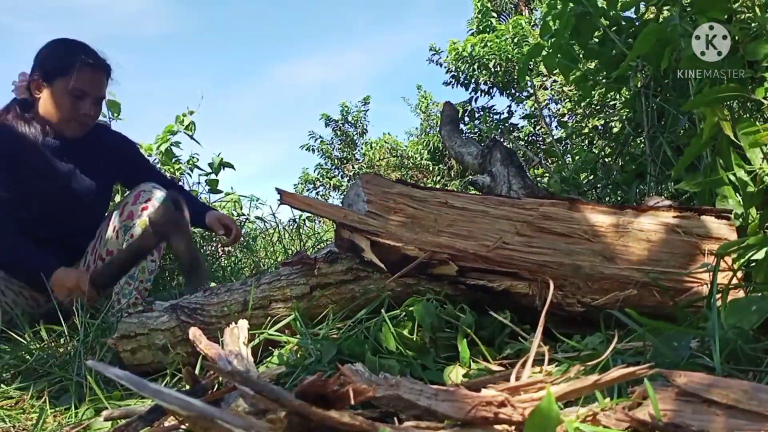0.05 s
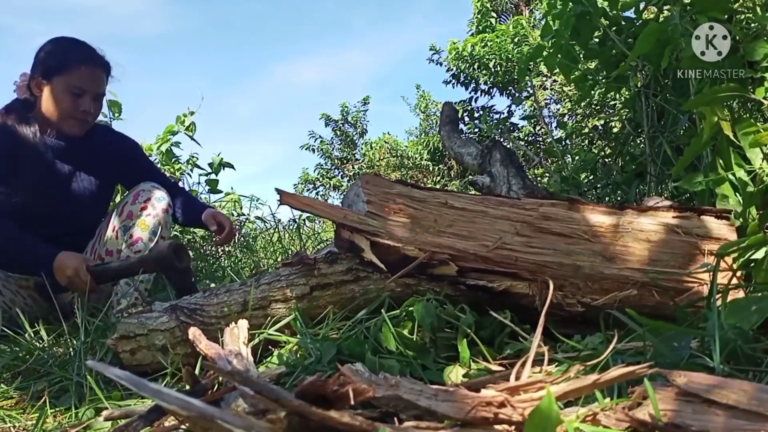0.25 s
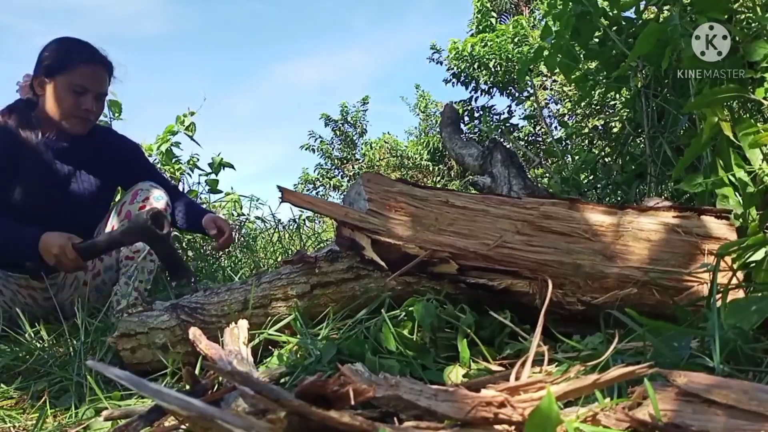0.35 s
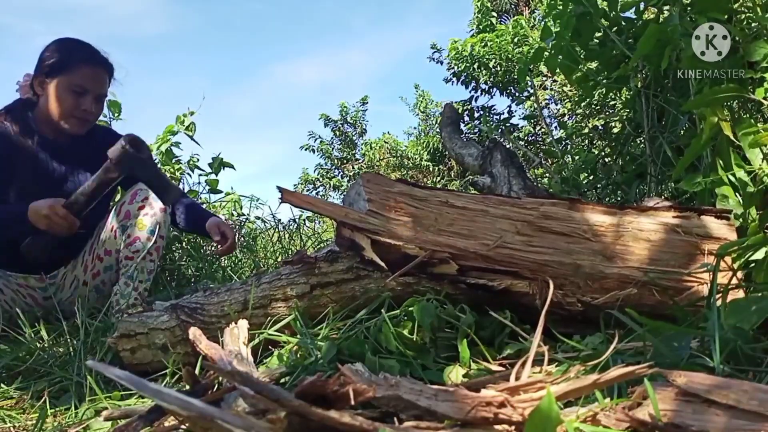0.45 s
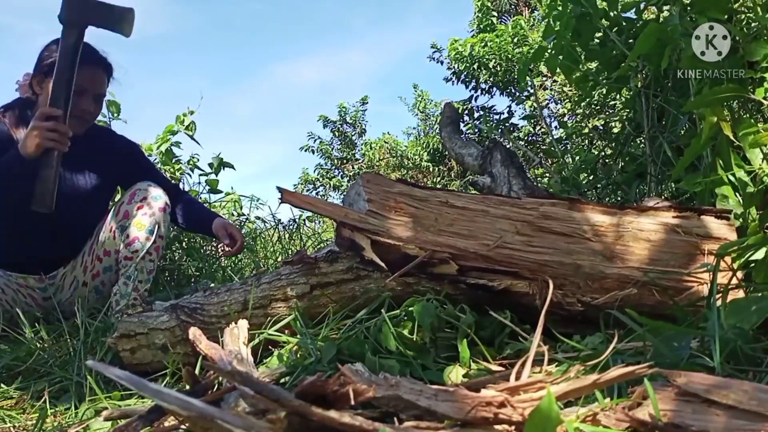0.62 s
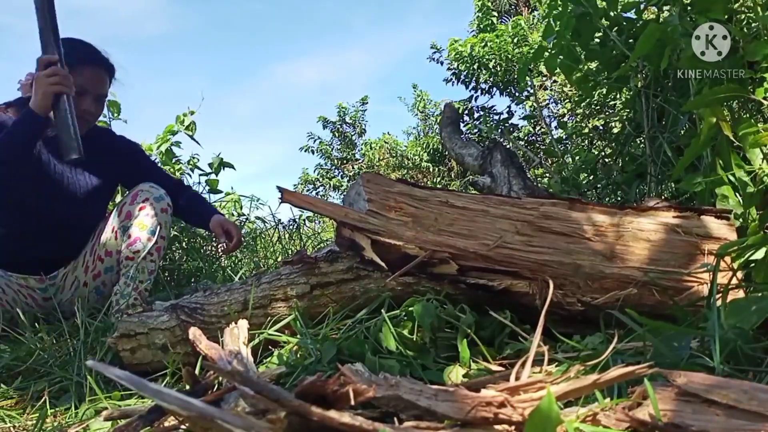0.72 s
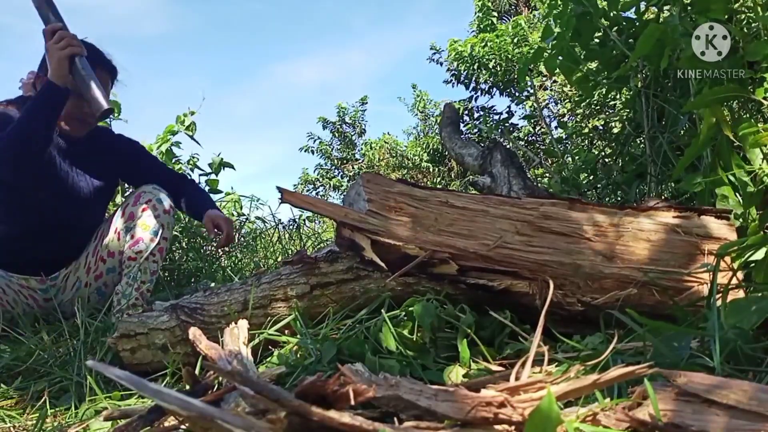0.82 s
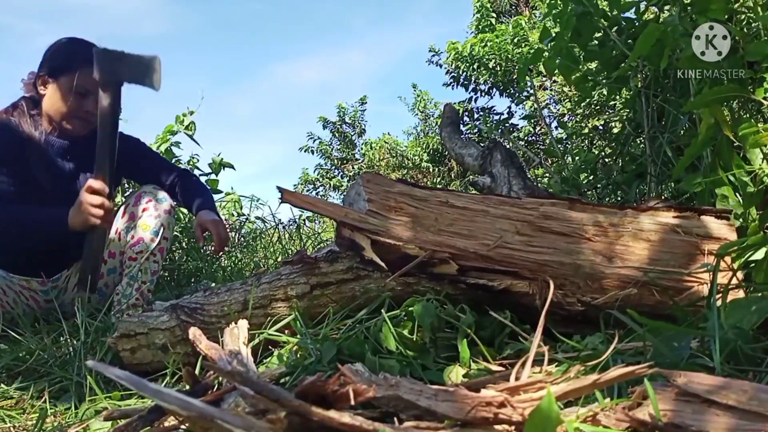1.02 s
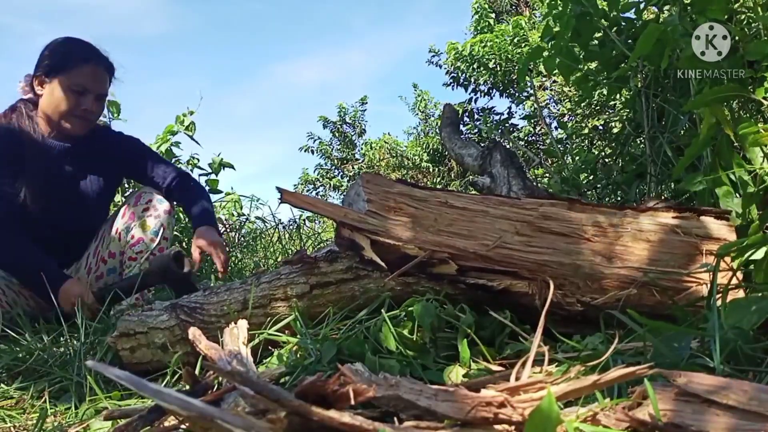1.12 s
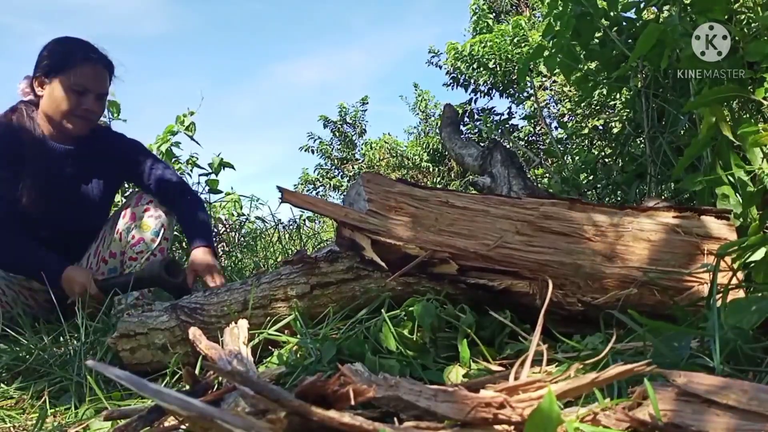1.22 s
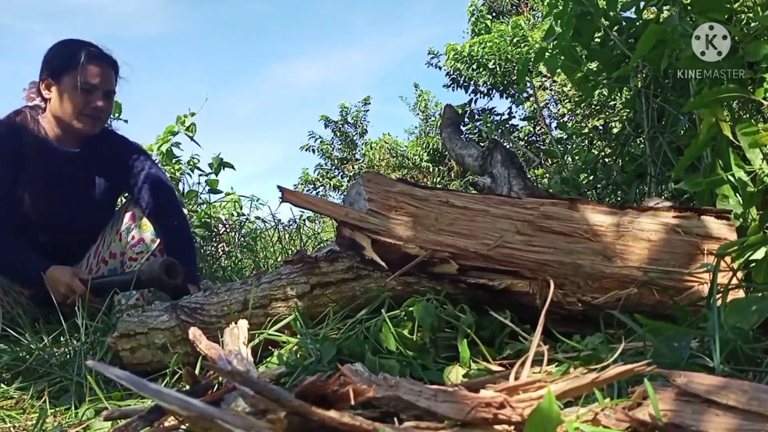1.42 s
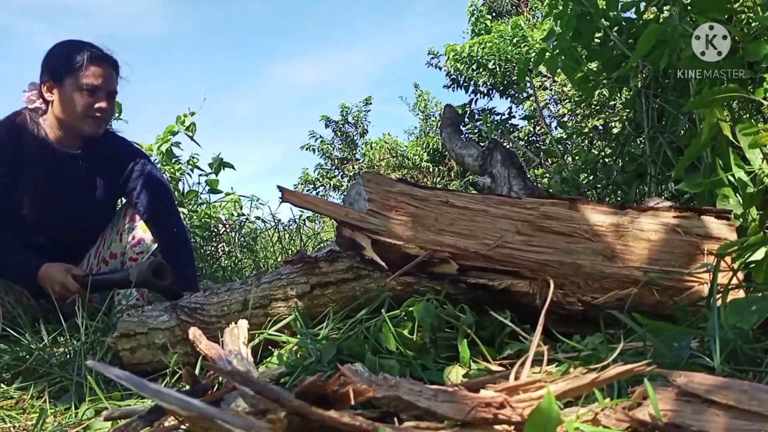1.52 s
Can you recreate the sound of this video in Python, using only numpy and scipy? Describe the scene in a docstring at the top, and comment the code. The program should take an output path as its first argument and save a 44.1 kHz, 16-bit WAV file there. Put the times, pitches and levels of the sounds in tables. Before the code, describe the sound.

A heavy blade chops a dry log at about 0.22 s: a short hollow knock, bright fibre crack, low ground thud and soft wash fading through the bushes. A very faint metallic ring follows near 0.45 s, with tiny ticks around 0.5, 1.0 and 1.2 s and a barely audible high whistle. A louder, fuller chop lands at 1.24 s. Quiet rumble and leaf hiss continue underneath.

```python
"""Two chops into a dry log

A heavy blade bites twice in quick jolts: short pushes ring the log's low modes, snaps its high modes.
Noise bursts are cracking fibres and splinters, a decaying sine is the ground thud, and swelling noise
is the soft late wash from the bushes. Shaped noise makes far rumble and leaf hiss; under it lie a faint
wavering whistle (sine), small ticks (band noise) and the ring of the blade pulled free (sine)."""
import sys
import numpy as np
from scipy import signal
from scipy.fft import rfft, irfft
from scipy.io import wavfile
from scipy.ndimage import uniform_filter1d

SR = 44100
rng = np.random.default_rng(int(sys.argv[2]) if len(sys.argv) > 2 else 0)


def volts(x):
    """Linear amplitude factor 10**(x/20) for a level x in dB, scalar or array-like."""
    e = np.asarray(x, float) / 20
    return 10 ** e


def transcribe(signal):
    """Save signal, clipped to [-1, 1], as a 16-bit WAV file at the path in sys.argv[1]."""
    frames = np.atleast_2d(signal).T
    limited = np.clip(frames, -1, 1)
    pcm = np.round(limited * 32767).astype(np.int16)
    wavfile.write(sys.argv[1], SR, pcm)


N = 68355

# modes of the log: pitch_hz, level_db, t60_s
LOG_MODES = [(145.7, -1.3, .092), (206.8, 5.3, .053), (315.7, -11.6, .109), (479.1, 9.5, .028),
             (683.9, .3, .099), (755, -20, .032), (950, -34, .04), (1500, -31, .025), (2500, -21, .014),
             (3000, -28, .02), (3570, -35, .06)]
SPLIT_HZ = 720  # jolts ring the modes below, snaps those above


def level(x, rms_db):
    """Scale to an rms level."""
    return x * volts(rms_db) / np.sqrt(np.mean(x ** 2))


def colour(x, points):
    """Weigh the spectrum by (Hz, dB) points, interpolated over log frequency."""
    hz, db = np.array(points, float).T
    f = np.maximum(np.arange(len(x) // 2 + 1) * SR / len(x), 1)
    gain = volts(np.interp(np.log(f), np.log(hz), db))
    return irfft(rfft(x) * gain, len(x))


def since(start_s):
    """Seconds after start_s, zero before."""
    return np.maximum(np.arange(N) / SR - start_s, 0)


def fade(t, t60_s):
    """Exponential decay, 60 dB in t60_s."""
    return np.exp(-np.log(1000) * t / t60_s)


def walk(rate_hz):
    """Unit normal levels held 1 / rate_hz s, then smoothed twice, which narrows their spread."""
    hold = int(SR / rate_hz)
    steps = np.repeat(rng.standard_normal(N // hold + 1), hold)
    return uniform_filter1d(uniform_filter1d(steps, hold), hold)[:N]


def rings(modes, place):
    """Impulse response: decaying sines, each weighted by its mode shape at a place along the log."""
    half_wave_hz = 155  # pitch whose half wave spans the log
    t = np.arange(SR // 3) / SR
    out = 0
    for hz, db, t60_s in modes:
        shape = np.cos(np.pi * hz / half_wave_hz * place)
        out = out + volts(db) * shape * np.sin(2 * np.pi * hz * t) * fade(t, t60_s)
    return out


def log_jolts():
    """Short flat pushes ring the low modes; the deepest bass does not radiate."""
    # jolts of the biting blade: start_s, level_db, push_ms, place (0-1 along the log)
    jolts = [(.22265, -8.6, .2, .379), (.22524, -12, .2, .379), (.22623, -5.9, .2, .379),
             (1.24154, -11.7, .9, .439), (1.24531, -5, .9, .439), (1.24746, -10.3, .9, .439)]
    radiates_from_hz = 120
    low_modes = [m for m in LOG_MODES if m[0] < SPLIT_HZ]
    out = 0
    for start_s, db, push_ms, place in jolts:
        travel = np.minimum(since(start_s) * 1000 / push_ms, 1)
        push = np.diff(travel, prepend=0)
        out = out + volts(db) * signal.fftconvolve(push, rings(low_modes, place))[:N]
    return signal.lfilter(*signal.butter(3, radiates_from_hz, "high", fs=SR), out)


def grain_snaps():
    """Single sharp snaps of the grain, as the blade stops, ring the high modes."""
    # snaps: start_s, level_db
    snap_list = [(0.2264, 5.5), (1.2470, 10.5)]
    from_hz, top_hz = 450, 4500
    ring = rings([m for m in LOG_MODES if m[0] > SPLIT_HZ], 0)
    x = sum(volts(db) * np.pad(ring, (int(start_s * SR), N))[:N] for start_s, db in snap_list)
    return signal.lfilter(*signal.butter(2, [from_hz, top_hz], "band", fs=SR), x)


def crack(start_s, crack_db):
    """Fibres tear as a fast noise burst, splinters as sparse random impulses; both share one spectrum."""
    # crack spectrum: pitch_hz, density_db (per Hz, relative)
    crack_spectrum = [(530, -38.5), (900, -11), (1250, -8), (1680, 2.5), (2000, -4.5), (2540, -2),
                      (3300, -3), (4600, -11.5), (5200, -13.5), (6560, -24.5), (8500, -5), (9500, -16),
                      (11100, -26.5), (14900, -28), (16000, -36)]
    rise_s, t60_s = 0.0035, 0.05
    splinter_db, splinter_t60_s, splinters_per_s = -4, 0.12, 9300
    t = since(start_s)
    rise = np.minimum(t / rise_s, 1)
    noise = rng.standard_normal(N)
    fibres = rise ** 2 * fade(np.maximum(t - rise_s, 0), t60_s) * noise
    hits = rng.random(N) < splinters_per_s / SR
    impulses = rng.standard_normal(N) * hits * np.sqrt(SR / splinters_per_s)  # unit rms
    splinters = volts(splinter_db) * rise * fade(t, splinter_t60_s) * impulses
    steady_rms = np.std(colour(noise, crack_spectrum))
    return volts(crack_db) * colour(fibres + splinters, crack_spectrum) / steady_rms


def thud(start_s, thud_db):
    """The ground answers late as a low decaying sine with a soft onset."""
    thud_hz, late_s, rise_s, t60_s = 86, 0.0091, 0.0092, 0.13
    t = since(start_s + late_s)
    envelope = (1 - np.exp(-t / rise_s)) * fade(t, t60_s)
    return volts(thud_db) * envelope * np.sin(2 * np.pi * thud_hz * t)


def wash(start_s, wash_db, hold_s):
    """The bushes return flickering noise that swells, holds and decays by band."""
    # wash spectrum: pitch_hz, density_db (per Hz, relative)
    wash_spectrum = [(35, -44), (60, -11), (110, -4), (156, -1.5), (227, -8.5), (437, -9.5), (621, -24),
                     (822, -18), (1200, -27.5), (1620, -16.5), (2400, -17.5), (3400, -15.5), (4300, -25.5),
                     (6430, -35.5), (8700, -24.5), (9700, -36.5), (12300, -44), (14900, -41), (16000, -63)]
    swell_start_s, peak_s = 0.02, 0.065  # after the blow
    bright_t60_s, dull_t60_s, split_hz = 0.46, 0.47, 4000
    t = since(start_s)
    swell = np.clip((t - swell_start_s) / (peak_s - swell_start_s), 0, 1)
    late = np.maximum(t - peak_s - hold_s, 0)
    noise = level(colour(rng.standard_normal(N), wash_spectrum), wash_db)
    noise = noise * volts(2.5 * walk(90))  # flicker: dB before smoothing, Hz
    dull = signal.lfilter(*signal.butter(2, split_hz, fs=SR), noise)
    bright = noise - dull
    return swell * (dull * fade(late, dull_t60_s) + bright * fade(late, bright_t60_s))


def blows():
    """Each blow sums its crack, ground thud and late wash."""
    # blows: start_s, crack_db, thud_db, wash_db, wash_hold_s
    blow_list = [(0.2211, -26, -28, -44, 0.057), (1.2416, -21, -21, -40, 0.013)]
    out = 0
    for start_s, crack_db, thud_db, wash_db, hold_s in blow_list:
        out = out + crack(start_s, crack_db) + thud(start_s, thud_db) + wash(start_s, wash_db, hold_s)
    return out


def blade_ring():
    """The blade rings faintly as it is pulled free: one decaying sine."""
    # ring: start_s, level_db, pitch_hz, t60_s
    blade_mode = (.445, -58, 2600, .3)
    start_s, db, hz, t60_s = blade_mode
    t = since(start_s)
    return volts(db) * fade(t, t60_s) * np.sin(2 * np.pi * hz * t)


def ticks():
    """Twigs and chips tick as decaying band noise."""
    # ticks: start_s, level_db, pitch_hz, t60_s
    tick_list = [(0.195, -68.5, 8500, 0.018), (.483, -62, 5584, 0.015), (1.018, -52.5, 1960, 0.022),
                 (1.217, -59, 5940, 0.019)]
    band_ratio = 1.3  # band edge to centre
    out = 0
    for start_s, db, hz, t60_s in tick_list:
        band = signal.butter(2, [hz / band_ratio, hz * band_ratio], "band", fs=SR)
        hiss = signal.lfilter(*band, rng.standard_normal(N))
        t = since(start_s)
        out = out + level(hiss, db) * fade(t, t60_s) * (t > 0)
    return out


def whistle():
    """A faint high sine glides between points while pitch and level waver."""
    # glide points: time_s, pitch_hz, level_db
    glide = [(.5, 5400, -88), (.75, 5420, -83), (1.1, 5480, -83), (1.2, 5720, -78), (1.235, 5600, -88)]
    t = np.arange(N) / SR
    time_s, hz, db = np.array(glide, float).T
    pitch_hz = np.interp(t, time_s, hz) * (1 + 0.018 * walk(410))  # blur: ratio before smoothing, Hz
    level_db = np.interp(t, time_s, db, -140, -140) + 4 * walk(49.44)  # flicker: dB before smoothing, Hz
    return volts(level_db) * np.sin(2 * np.pi * np.cumsum(pitch_hz) / SR)


def air():
    """Far rumble in lumps, leaf hiss above it: one shaped noise, two wandering bands."""
    # air spectrum: pitch_hz, density_db (per Hz, relative)
    air_spectrum = [(18, -48), (30, -22), (44, -25), (75, 1.5), (124, -2.5), (165, -0.5), (220, -9.5),
                    (300, -11.5), (473, -18.5), (780, -21), (3200, -22), (4400, -33), (4800, -33),
                    (5400, -38), (6100, -44), (7500, -40.5), (8500, -33.5), (9500, -37), (10200, -45.5),
                    (11200, -41.5), (12300, -50.5), (14900, -53.5), (16000, -50.5)]
    air_db, split_hz = -56.5, 350
    x = colour(rng.standard_normal(N), air_spectrum)
    rumble = signal.lfilter(*signal.butter(2, split_hz, fs=SR), x)
    hiss = x - rumble
    # wander: dB before smoothing, Hz
    return level(rumble * volts(2.5 * walk(4.7)) + hiss * volts(3.7 * walk(12)), air_db)


def scene():
    """All sources, one microphone."""
    chop = log_jolts() + grain_snaps() + blows()
    return (chop + blade_ring() + ticks() + whistle() + air())[None]


def roll_off(x):
    """The treble ends steeply here."""
    return signal.sosfilt(signal.butter(12, 16460, fs=SR, output="sos"), x)


def record(dry):
    """The phone cuts the deepest bass and rounds the loudest peaks."""
    mic_low_hz, ceiling = 55, 1.15  # ceiling re full scale
    x = signal.lfilter(*signal.butter(2, mic_low_hz, "high", fs=SR), dry)
    mix = ceiling * np.tanh(x / ceiling)
    return roll_off(mix)


dry = scene()
out = record(dry)
transcribe(out)
```